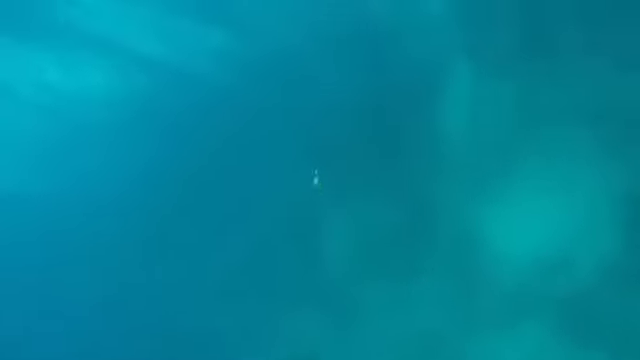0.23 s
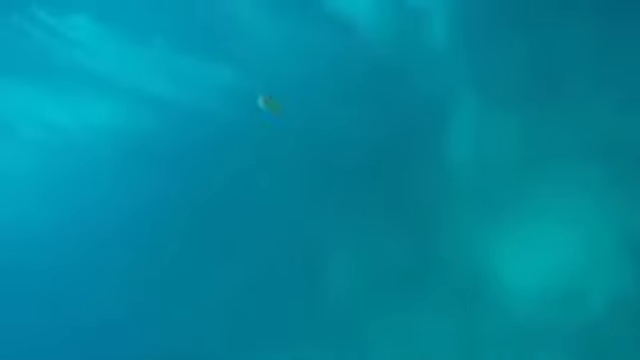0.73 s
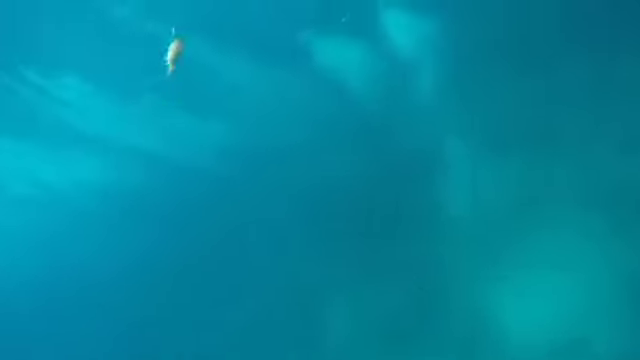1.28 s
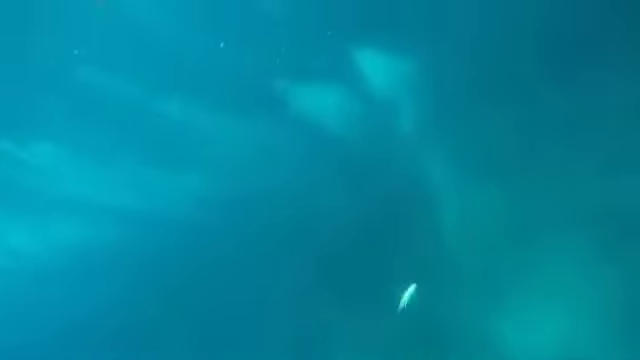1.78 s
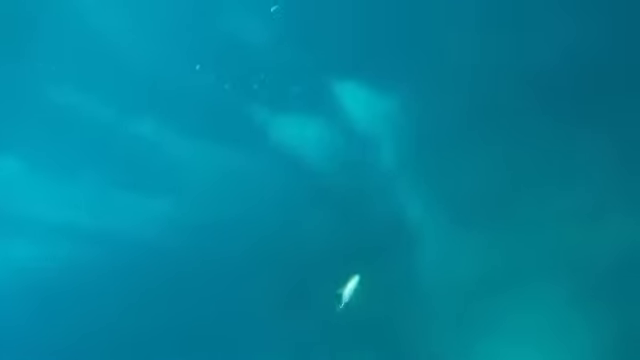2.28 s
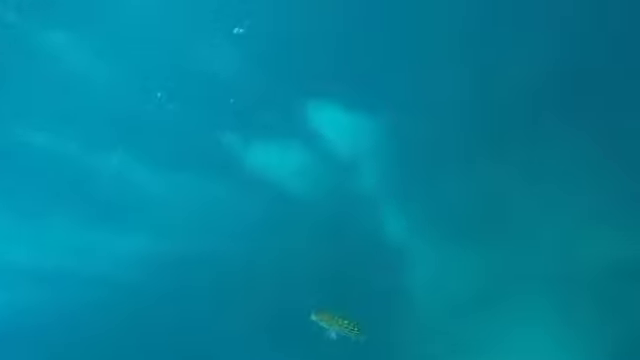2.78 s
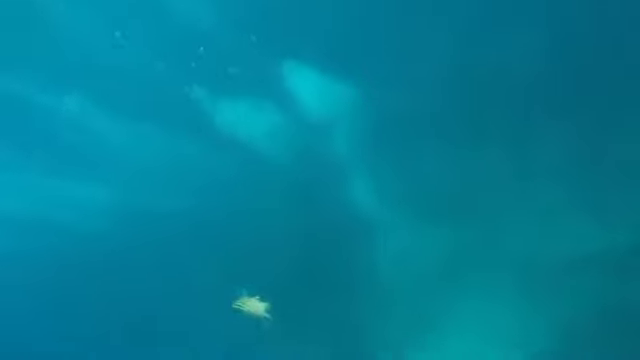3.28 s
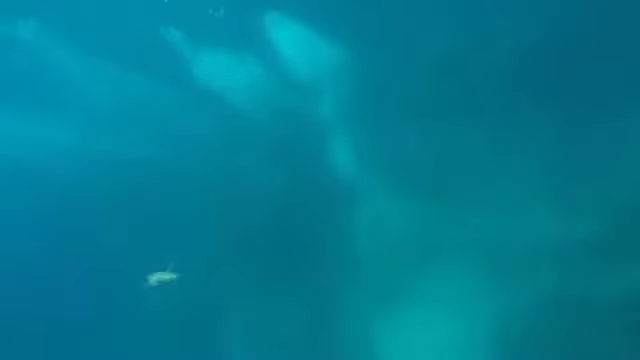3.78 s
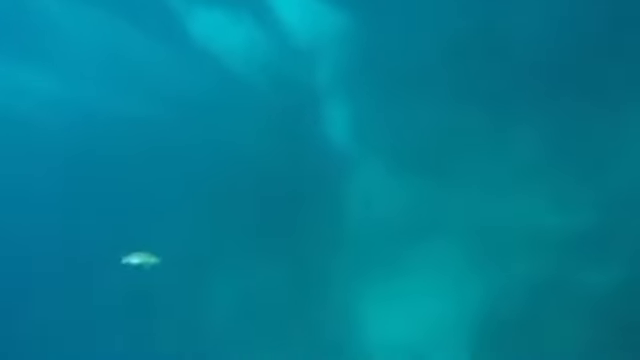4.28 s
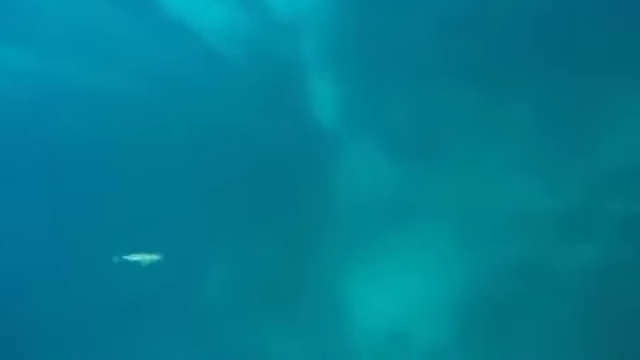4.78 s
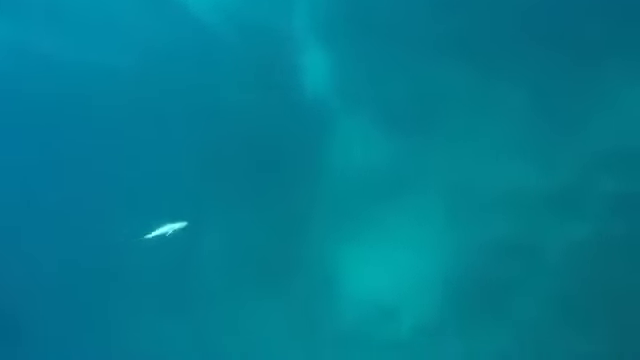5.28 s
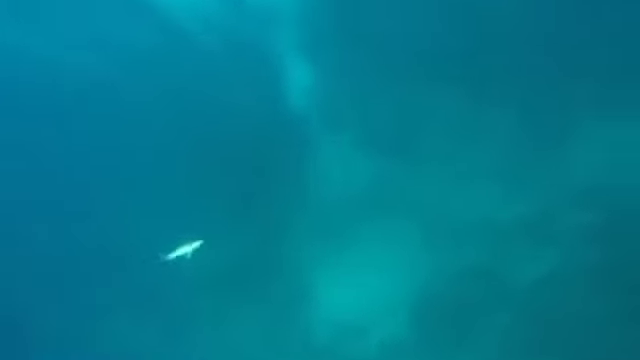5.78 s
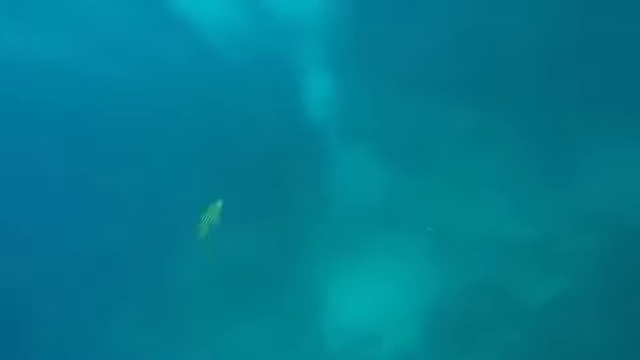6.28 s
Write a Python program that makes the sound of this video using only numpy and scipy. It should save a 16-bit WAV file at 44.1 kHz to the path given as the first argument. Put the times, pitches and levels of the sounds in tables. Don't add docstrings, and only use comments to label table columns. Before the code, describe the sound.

Underwater, a slow single-cylinder boat engine knocks about six times a second, each firing ringing the air inside a sealed camera case, with valve clacks and loose metal rattle between. It eases up slightly, then gradually slows and weakens toward the end. Heavy low water rumble presses on the microphone, while small reef animals snap sharply over a thin hiss.

```python
import sys
import numpy as np
from scipy import signal
from scipy.io import wavfile
from scipy.ndimage import uniform_filter1d

SR = 44100
rng = np.random.default_rng(int(sys.argv[2]) if len(sys.argv) > 2 else 0)


def nominal_scale(level):
    x = np.asarray(level, float) / 20
    return 10 ** x


def waveform_to_disk(signal):
    frames = np.transpose(np.atleast_2d(signal))
    scaled = np.clip(frames, -1, 1) * 32767
    samples = np.round(scaled).astype(np.int16)
    wavfile.write(sys.argv[1], SR, samples)


N = 288414


def evened(x):
    return x / np.sqrt(np.mean(x ** 2) + 1e-20)


def along(curve, s):
    return np.interp(s, *np.transpose(curve))


def read(points, hz):
    f, value = np.transpose(points)
    return np.interp(np.log(hz + 1), np.log(f + 1), value, left=-100, right=-100)


def butter(x, order, hz, kind):
    return signal.sosfilt(signal.butter(order, hz, kind, fs=SR, output="sos"), x)


def colour(x, points, size=8192):
    log_gain = np.log(nominal_scale(read(points, abs(np.fft.fftfreq(size, 1 / SR)))))
    spectrum = np.exp(np.conj(signal.hilbert(log_gain)))
    taps = np.fft.ifft(spectrum).real[:size // 2]
    return signal.oaconvolve(x, taps / np.linalg.norm(taps))[:N]


def modes(x, table):
    t = np.arange(SR // 4) / SR
    taps = np.zeros(len(t))
    for hz, width, db in table:
        taps += nominal_scale(db) * np.exp(-np.pi * width * t) * np.sin(2 * np.pi * hz * t)
    return signal.oaconvolve(x, taps)[:N]


def drift(hz):
    return evened(butter(rng.standard_normal(N), 2, hz, "low"))


def clicks(s, size):
    at = np.round(s * SR).astype(int)
    inside = (at >= 0) & (at < N)
    return np.bincount(at[inside], size[inside], N)


# start in seconds, peak in dB, centre in Hz,
# level above 9 kHz in dB relative to the peak.
NEAR_SNAPS = [(.1506, -24, 5950, -19), (.5018, -33.5, 5290, 1), (.7306, -19.5, 5000, -30),
              (.7647, -29, 5560, -24), (.833, -29, 5370, -11), (.8634, -24.5, 5500, -21),
              (.8839, -23.5, 5550, -27), (.97, -23, 4900, -24), (1.1695, -25, 5050, -2),
              (1.256, -23, 5500, -38), (1.3648, -32, 5070, -9), (1.432, -33, 8140, 3),
              (1.4772, -23, 4530, -12), (2.171, -25, 5100, -18), (2.9262, -26, 6220, -17),
              (3.1921, -27, 6200, -5), (3.373, -25, 7810, -16), (3.3902, -26, 8470, -12),
              (3.5284, -23.5, 5030, -9), (4.1803, -22, 6260, -4), (4.3664, -19, 4500, -5),
              (4.972, -32, 6600, 7), (5.004, -26, 5100, 0), (5.2075, -15, 3800, -35),
              (5.6173, -20, 6350, -14), (5.7897, -24, 4930, -6), (5.9236, -24, 7920, -10),
              (6.089, -21.5, 6190, -22), (6.32, -24, 6500, -8), (6.336, -20.5, 5060, -11)]


def snaps():
    # start in seconds, peak in dB, centre in Hz, level above 9 kHz in dB
    ranges = [(0, N / SR), (-49, -34), (4700, 8500), (-20, -5)]
    low, high = np.transpose(ranges)
    return NEAR_SNAPS + list(low + (high - low) * rng.random((35, 4)))


# pitch in Hz, level in dB.
HISS_COLOUR = [(2880, -27), (4900, -5), (5640, 0.5), (5950, -7.5), (6400, 3), (6880, -5.5), (7950, 1.5),
               (10200, -6), (11200, -1), (13000, -9), (14400, -4), (15600, -10)]


def reef():
    crowd_per_s, crowd_spread_db, crowd_db, hiss_db = 180.0, -3.0, -59.5, -61.5
    t = np.arange(600) / SR
    out = np.zeros(N + len(t))
    for s, peak_db, hz, top_db in snaps():
        burst = rng.standard_normal((2, len(t))) * nominal_scale(-60 * t / 0.011)
        body = butter(burst[0], 1, [hz * 0.77, hz * 1.06], "band")
        top = butter(burst[1] * nominal_scale(-60 * t / .008), 3, 9000, "high")
        snap = body / abs(body).max() + nominal_scale(top_db) * top / abs(top).max()
        at = round(s * SR)
        out[at:at + len(t)] += nominal_scale(peak_db - 5.5) * snap
    happens = rng.random(N) < crowd_per_s / SR
    crowd = happens * nominal_scale(crowd_spread_db * np.minimum(rng.exponential(1, N), 3.2))
    crowd = signal.oaconvolve(crowd, nominal_scale(-60 * t / 0.0094))[:N] * rng.standard_normal(N)
    hiss = nominal_scale(hiss_db) * rng.standard_normal(N) * nominal_scale(.8 * drift(40.))
    return out[:N] + colour(hiss + nominal_scale(crowd_db) * evened(crowd), HISS_COLOUR)


# pitch in Hz, level in dB per Hz.
RUMBLE_COLOUR = [(4.7, -49), (8.0, 0), (27, 2.5), (43, 1.5), (86, -6.5), (122, -8.5), (173, -20.5),
                 (210, -20.5), (297, -18.5), (348, -24.5), (452, -17), (493, -25.5), (520, -24),
                 (680, -41.5), (1140, -120)]
# time in seconds, level in dB.
FLOW_LEVEL = [(0, -17), (.8, -18), (1.4, -18.5), (2.3, -15), (3.3, -19.5), (3.65, -16.5), (4.3, -17.5),
              (4.7, -16.5), (5.6, -17.5), (6.2, -16), (6.3, -11), (6.38, -17.5), (6.54, -15.5)]


def water():
    lumps = nominal_scale(1.5 * drift(12.))
    flow = evened(colour(rng.standard_normal(N) * lumps, RUMBLE_COLOUR, size=32768))
    return flow * nominal_scale(along(FLOW_LEVEL, np.arange(N) / SR) - 4.0)


# pitch in Hz, width in Hz, level in dB.
BUMP_MODES = [(572, 14, -9)]


def bump():
    nudge = clicks(np.array([.826]), np.ones(1))
    return modes(uniform_filter1d(nudge, size=30), BUMP_MODES)


# time in seconds, level in dB, length in seconds.
HUM_SURGES = [
    (4.32, -1.5, 0.14),
    (4.65, 6, 0.27),
    (5.79, 5, 0.23),
    (6.3, 4, .05),
]


def hum():
    drone_db, swell_db = -26.5, 3
    t = np.arange(N) / SR
    surges_db = sum(db * np.exp(-((t - s) / length) ** 2) for s, db, length in HUM_SURGES)
    return nominal_scale(drone_db + swell_db * drift(2.2) + surges_db)


# time in seconds, firings per second.
ENGINE_SPEED = [(0, 6.441), (1.05, 6.618), (1.7, 6.879), (2.1, 6.961), (3.6, 6.663), (4.6, 6.281),
                (5.6, 5.724), (6.54, 5.0)]
# time in seconds, level in dB.
BURN_LEVEL = [(0, -1), (.5, .5), (.8, -2), (1.3, 1), (1.8, -2), (2.3, 0), (2.6, -1), (3.0, -2), (3.4, -1),
              (3.9, -2.5), (4.35, -1), (4.8, -4), (5.3, -3.5), (5.67, -7.5), (5.85, -3.5), (6.02, -6.5),
              (6.22, 0.5), (6.42, -2)]
# usual level in dB,
# dB per dB of burn, dB per extra firing a second, random scatter in dB.
SOUND_PATHS = [
    (-26, 0, 0, 1.6),
    (-10.5, 1.0, 0.5, 0.4),
    (-33, 0.95, -2.5, 3.5),
    (-26, 0.5, -1.7, 1.5),
    (-26, 0, -9.5, -0.8),
]


def cycles():
    first_turn, usual_per_s = .109, 6.5
    stumble_s, early_s = 6.03, .0095
    t = np.arange(-SR // 5, N + SR // 5) / SR
    turns = np.cumsum(along(ENGINE_SPEED, t)) / SR
    turns = turns - turns[SR // 5] - first_turn
    start = np.interp(np.arange(-1, np.floor(turns[-1]) + 1), turns, t)
    start = start - early_s * (abs(start - stumble_s) < .05)
    usual_db, per_burn, per_speed, scatter_db = np.transpose(SOUND_PATHS)
    extra_speed = along(ENGINE_SPEED, start) - usual_per_s
    level_db = usual_db + np.outer(along(BURN_LEVEL, start), per_burn) + np.outer(extra_speed, per_speed)
    level_db = level_db + scatter_db * rng.standard_normal(level_db.shape)
    return start[:-1], np.diff(start), level_db[:-1]


HULL_PUSHES = [
    (.06, -.33),
    (.115, -.68),
    (.19, .25),
    (.25, -.75),
    (.418, .2),
    (.61, .4),
    (.695, -.12),
    (.815, .32),
    (.953, -.52),
]
# pitch in Hz, width in Hz, level in dB.
HULL_MODES = [(34, 14, -14.5), (43, 14, -18.5), (65, 19.5, -22), (118.7, 38, -20.5), (207.4, 38.6, -24),
              (306, 130, -27.5)]


def hull(start, length, thump_db):
    push = np.zeros(N)
    for share, force in HULL_PUSHES:
        push += clicks(start + length * share, force * nominal_scale(thump_db + 28.0))
    return modes(push, HULL_MODES)


# pitch in Hz, width in Hz, level in dB.
PIPE_MODES = [(1140, 70, -3), (1320, 100, -6.5), (1537, 75, 0.5), (1760, 48, -4), (3370, 88, -14.5)]


def chuff(start, length, clatter_db):
    share, level_db, t60_s, rise_s = 0.544, -18.5, 0.1, 0.0042
    scatter_db = 1.5 * rng.standard_normal(len(start))
    puffs = clicks(start + share * length, nominal_scale(clatter_db + level_db + scatter_db))
    t = np.arange(SR // 8) / SR
    puff_shape = np.minimum(t / rise_s, 1) * nominal_scale(-60 * t / t60_s)
    strength = signal.oaconvolve(puffs, puff_shape)[:N]
    return modes(strength * rng.standard_normal(N), PIPE_MODES)


# pitch in Hz, width in Hz, level in dB.
WALL_MODES = [(410, 45, -16.5), (458, 44, -8.5)]


def housing_wall(blow, noise):
    dying = nominal_scale(-60 * np.arange(SR // 5) / SR / 0.096)
    buzz = np.sqrt(abs(signal.oaconvolve(blow ** 2, dying ** 2)[:N]))
    wall = modes(nominal_scale(-12.5) * blow + (nominal_scale(-12.0) * buzz + nominal_scale(-50.5)) * noise, WALL_MODES)
    return butter(wall, 2, [340, 500], "band")


# pitch in Hz, width in Hz, level in dB.
AIR_MODES = [(560, 35, -18), (618, 33, -8), (652, 32, -15), (690, 45, -21)]


def housing_air(blow, impact, rattle, noise):
    burn = blow + .55 * np.roll(blow, round(.0033 * SR)) + .4 * np.roll(blow, round(.0065 * SR))
    shaking = (nominal_scale(-27) * rattle + nominal_scale(-20.5) * hum()) * noise
    air = modes(nominal_scale(5) * burn + nominal_scale(5) * impact + shaking, AIR_MODES)
    return butter(nominal_scale(2.5) * air, 3, [370, 730], "band")


# pitch in Hz, level in dB.
FIZZ_COLOUR = [(2300, -21), (2500, 2.5), (2950, 0.5), (3150, -4.5), (3460, 0), (3700, -9.5), (4250, -6.5),
               (4700, -45), (5300, -26.5), (5900, -34), (6500, -24), (9000, -36)]


def fizz(impact, rattle, noise):
    return colour(nominal_scale(9) * impact + (nominal_scale(-5) * rattle + nominal_scale(-56)) * noise, FIZZ_COLOUR)


# pitch in Hz, level in dB.
CLATTER_COLOUR = [(700, -47.5), (800, 1.5), (1000, -0.5), (1140, 1.5), (1220, -2), (1300, -0.5),
                  (1400, -5.5), (1530, -0.5), (1660, -5.5), (1755, -1.5), (1810, -14.5), (1870, -12),
                  (2000, -18)]


def clatter(blow, impact, rattle, noise):
    shaking = (nominal_scale(2.0) * rattle + nominal_scale(-50.5)) * noise
    return colour(nominal_scale(22.5) * blow + nominal_scale(3.0) * impact + shaking, CLATTER_COLOUR)


# pitch in Hz, level in dB.
TICK_COLOUR = [(1500, -30), (2000, -6), (2300, 0), (3000, -6), (4300, -8), (5300, -15), (6000, -27),
               (8000, -31), (12000, -46)]
# pitch in Hz, level in dB.
KNOCK_COLOUR = [(1800, -40), (1930, -21.5), (2068, 2), (2125, -3), (2195, -1.5), (2270, -9.5), (2420, -13),
                (2700, -31.5)]


def knock(blow, impact, rattle, noise):
    tick = colour(nominal_scale(14.5) * blow + nominal_scale(4) * impact, TICK_COLOUR)
    shaking = (nominal_scale(-4) * rattle + nominal_scale(-44)) * noise
    return tick + colour(nominal_scale(21) * blow + nominal_scale(27.5) * impact + shaking, KNOCK_COLOUR)


# share of the cycle, knock in dB, ring in dB,
# clatter in dB, fizz in dB, time to die by 60 dB in seconds.
CYCLE_STROKES = [(0, 2.5, 21, 3.5, 2, 0.05), (.06, -8.5, -5, 2.6, -5.5, 0.02),
                 (.115, -13.5, 0.5, -0.5, -6, 0.016), (0.192, -40, -35, -22, -15.5, 0.064),
                 (.252, -9, -9, -2.5, -10, 0.052), (.419, -9, -10.5, -9.5, -9.5, 0.054),
                 (.516, -9.5, -10, -0.5, -9, 0.055), (.6, -14, -13, -14, -25, .05),
                 (.697, -9.5, -10.5, -8, -9, 0.056), (0.798, -35, -26.5, -3.5, -12.5, 0.039),
                 (.945, -34, -19.5, -8, -15, .05)]


def strokes(start, length, level_db):
    scatter_db, jitter, follow = 1.5, .004, .3
    rattle_power, impact = np.zeros((4, N)), np.zeros((4, N))
    load_db = uniform_filter1d(level_db, size=7, axis=0)
    load_db[:, 0] = load_db[:, 0].mean()
    own_db = load_db + follow * (level_db - load_db)
    for share, *stroke_db, t60 in CYCLE_STROKES:
        chance = rng.standard_normal((len(start), 5))
        valve = share > .03
        s = start + length * (share + jitter * chance[:, 4]) * valve
        for k in range(4):
            size = nominal_scale(own_db[:, k % 3] + stroke_db[k] + scatter_db * chance[:, k])
            size = size * (valve or k != 1)
            fade = nominal_scale(-120 / (t60 * SR))
            rattle_power[k] += signal.lfilter([1], [1, -fade], clicks(s, size ** 2))
            impact[k] += clicks(s, size * valve)
    return np.sqrt(abs(rattle_power)), impact


def engine():
    start, length, level_db = cycles()
    rattle, impact = strokes(start, length, level_db)
    blow = [clicks(start, nominal_scale(level_db[:, k])) for k in range(5)]
    noise = rng.standard_normal((5, N)) * nominal_scale(1.2 * drift(150.))
    out = hull(start, length, level_db[:, 3])
    out += chuff(start, length, level_db[:, 2])
    out += housing_wall(blow[4], noise[4])
    out += housing_air(blow[1], impact[1], rattle[1], noise[1])
    out += fizz(impact[3], rattle[3], noise[3])
    out += clatter(blow[2], impact[2], rattle[2], noise[2])
    return out + knock(blow[0], impact[0], rattle[0], noise[0])


def scene():
    return (reef() + water() + bump() + engine())[None]


def top_cut(x):
    return signal.sosfilt(signal.butter(12, 16220, fs=SR, output="sos"), x)


def record(dry):
    dry = butter(dry, 3, 17, "high")
    loud = 1.576 * np.tanh(dry / 1.46)
    treble_cut = signal.firwin(255, 15600, window=("kaiser", 7), fs=SR)
    mix = signal.oaconvolve(loud, treble_cut[None], "same")
    return top_cut(mix)


dry = scene()
out = record(dry)
waveform_to_disk(out)
```